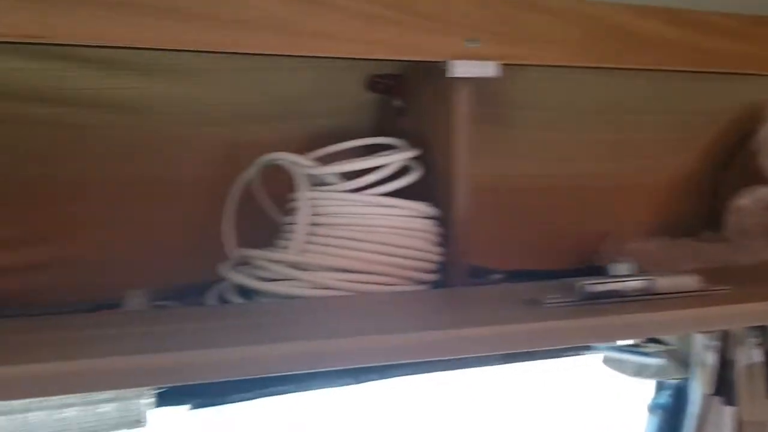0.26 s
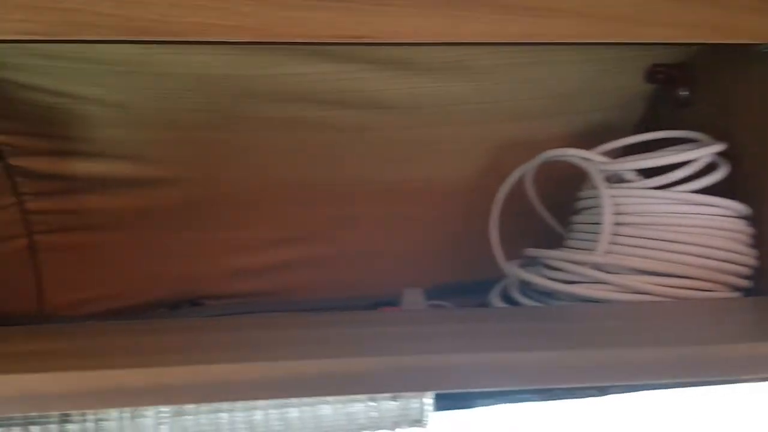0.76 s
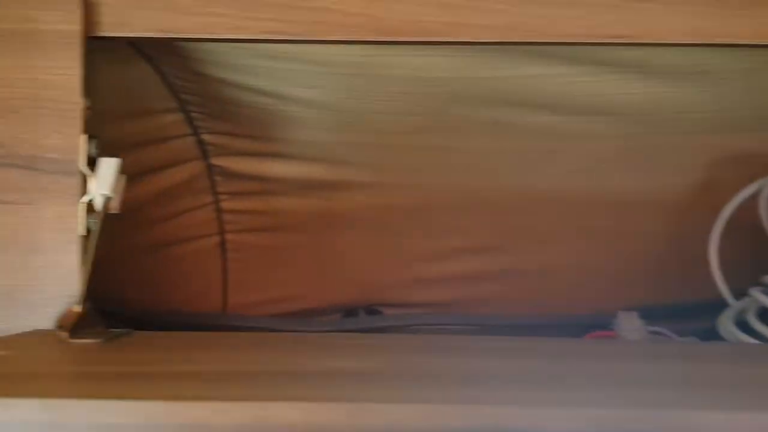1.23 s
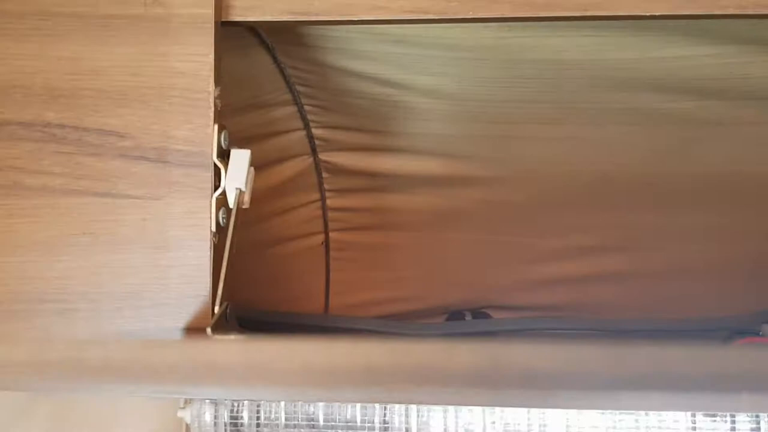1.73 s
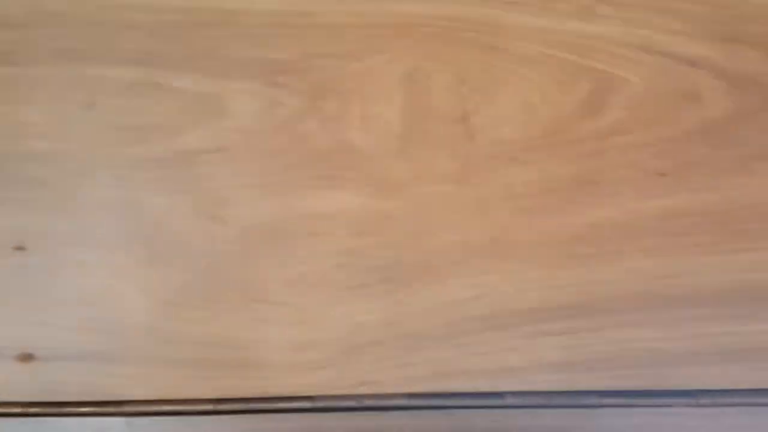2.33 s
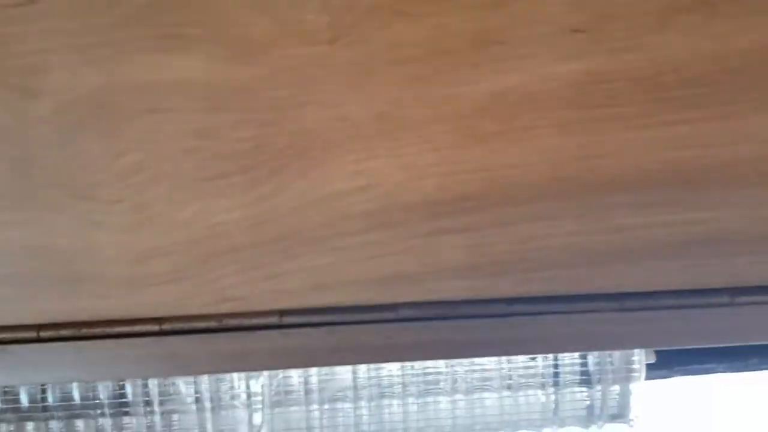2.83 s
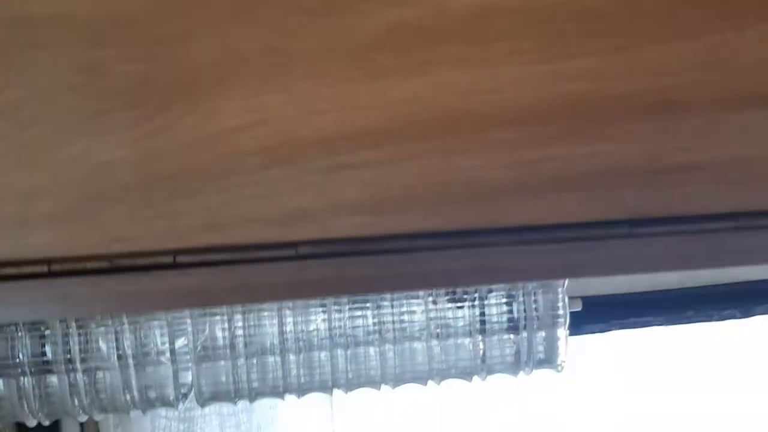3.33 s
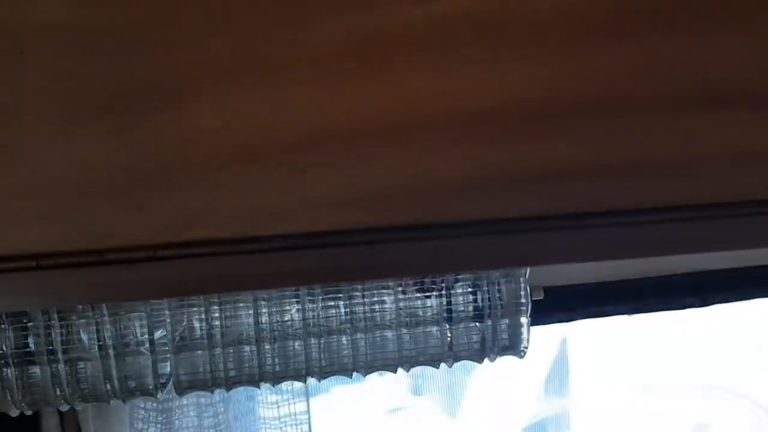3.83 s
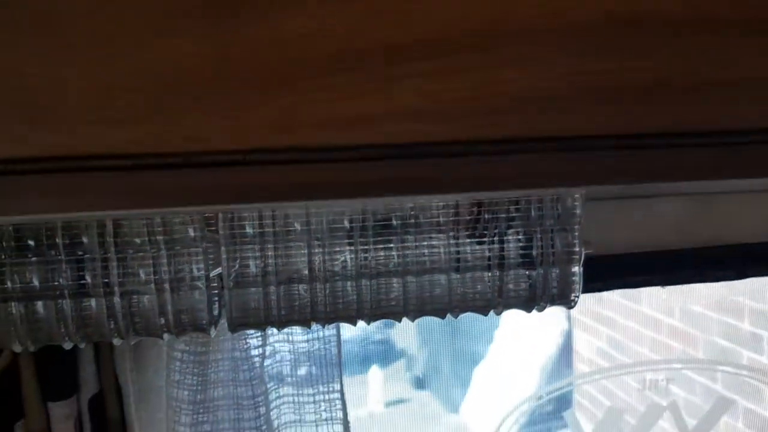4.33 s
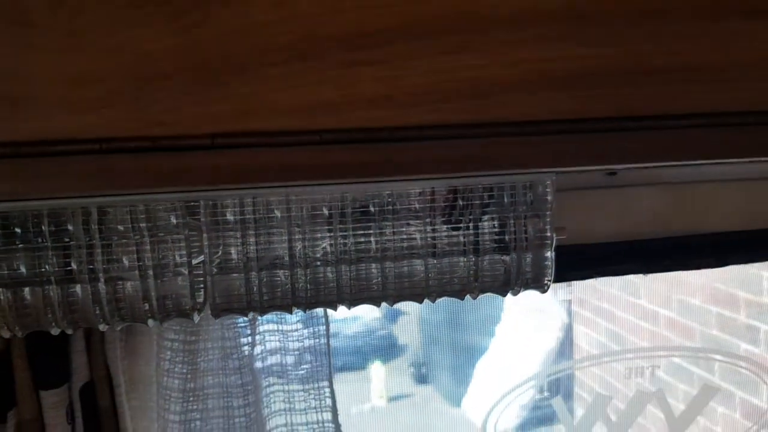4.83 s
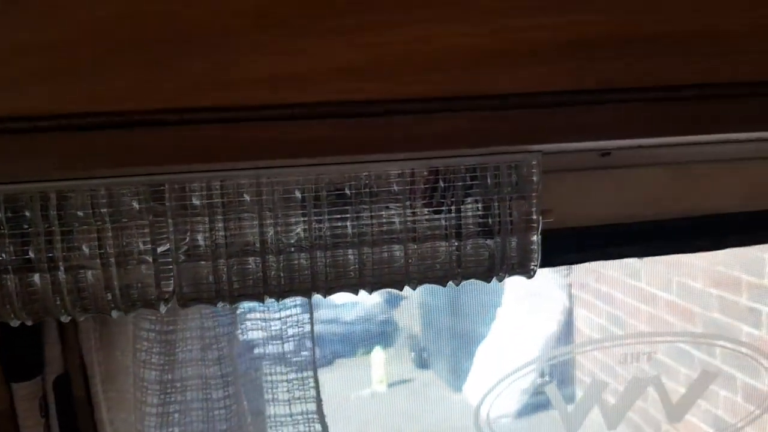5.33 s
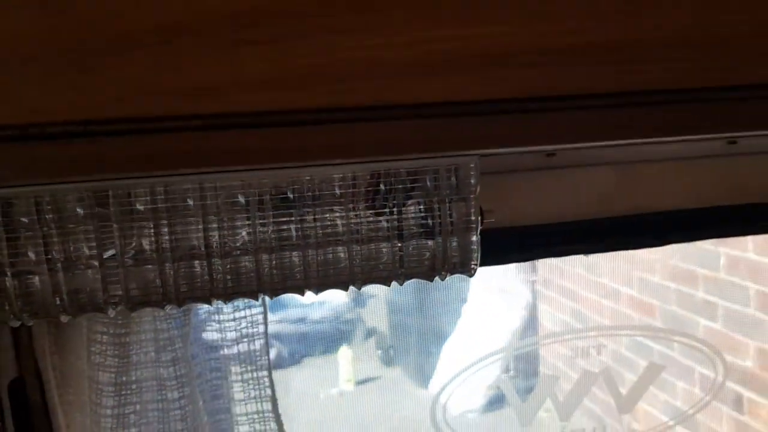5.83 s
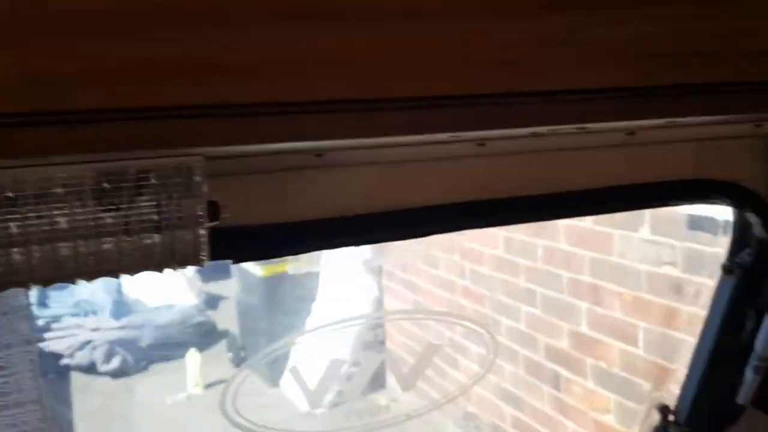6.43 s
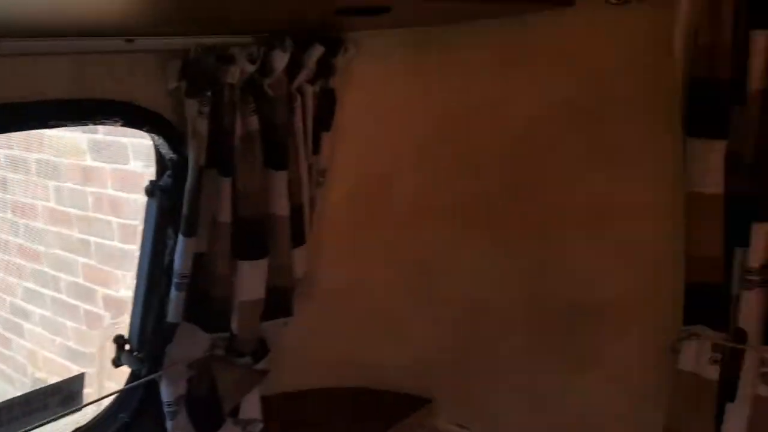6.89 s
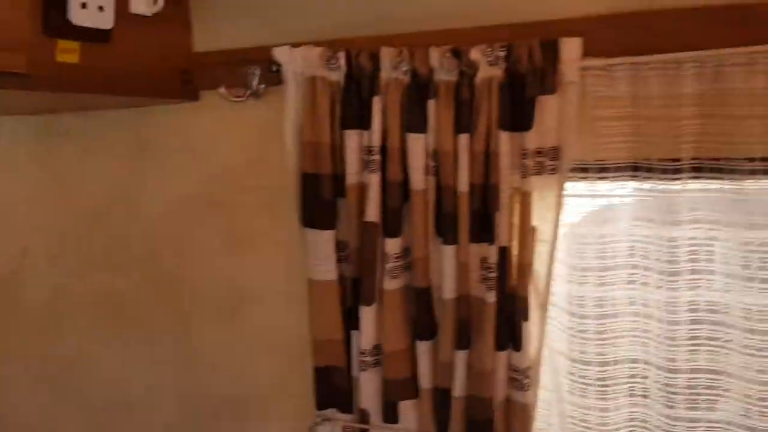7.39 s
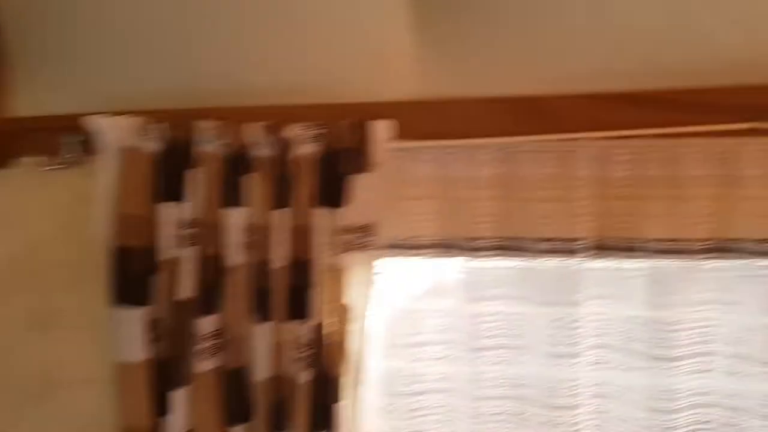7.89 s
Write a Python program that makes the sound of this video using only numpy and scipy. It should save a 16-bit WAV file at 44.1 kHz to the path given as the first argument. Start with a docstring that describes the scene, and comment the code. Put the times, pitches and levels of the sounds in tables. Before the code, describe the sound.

Inside a small caravan, a hand moves a wooden overhead locker door. Faint bumps and rubbing come first, then a clatter of knocks and clicks just before two seconds and a loud, hard shutting clack around 2.4. Smaller clicks follow, with firm thuds near 3.8 and 5.0 and a short fumble afterwards. The end is nearly quiet, with soft rubs and ticks. Close handheld stereo microphone, dry room, light hiss.

```python
"""A wooden overhead locker door is handled, swung and shut in a small caravan, close to a phone.
Knocks ring the panel and cabin as fading sine tones; the catch, stay and fingers click as short noise bursts.
Sliding contacts sing as noise in gliding bands; hands, door and clothes rub as coloured noise that swells and fades.
The phone has two microphone ports, heard as left and right, and each port adds a soft hiss."""
import sys
import numpy as np
from scipy.fft import rfft, irfft, next_fast_len
from scipy.io import wavfile
from scipy.ndimage import uniform_filter1d, map_coordinates

SR = 44100
rng = np.random.default_rng(int(sys.argv[2]) if len(sys.argv) > 2 else 0)


def wrap_up_sound(samples):
    """Save the sound to the file named by the first command line argument, as 16-bit audio."""
    columns = np.atleast_2d(samples).T
    # keep every value between -1 and 1, then stretch to whole-number steps
    tamed = np.clip(columns, -1, 1)
    steps = np.round(tamed * 32767).astype(np.int16)
    wavfile.write(sys.argv[1], SR, steps)


N = 359409

# Knocks on wood, before the trims in knocks():
# (time [s], panel level [dB], cabin boom re panel [dB], upper tones re panel [dB])
KNOCK_EVENTS = [(0.009, -42, 11, 1), (0.337, -42, 14.5, -2.5), (0.713, -34.5, 9.5, -8.5),
                (0.789, -34.5, 11, -8), (0.875, -52, 16, -26), (0.937, -56, 13, -20), (0.979, -48, 8, -4.5),
                (1.061, -43.5, 20, -2), (1.103, -36, 2.5, -13.5), (1.349, -40.5, -5, -16),
                (1.382, -31, -7, -14.5), (1.423, -26, -13, -18.5), (1.664, -27, -16, -15),
                (1.71, -31.5, -28, -12), (1.757, -26, -0.5, -13), (1.812, -12.5, -35, -10),
                (1.84, -20, -6, -1.5), (1.863, -29.5, -29, -2), (1.884, -19.5, -25, -14),
                (1.918, -17, -18, -10), (1.961, -29, -8, 0.5), (2.061, -34, -38, -1.5),
                (2.178, -26, -12, -7.5), (2.206, -24, -24, -7.5), (2.26, -21.5, -12, -16),
                (2.401, -3, -9, -8.5), (2.545, -39.5, -4, -7.5), (2.596, -41, -26, -5),
                (2.804, -32, 2, -2.5), (2.896, -37.5, 6.5, 4.5), (3.013, -36.5, -13.5, -17),
                (3.193, -30, 2, -7.5), (3.277, -37, -14, -2.5), (3.333, -31.5, -13, -7),
                (3.539, -36, -10, -4.5), (3.557, -30, -26.5, -6), (3.72, -37, 2.5, -18),
                (3.768, -13.5, -8, -6.5), (3.99, -37.5, -7.5, -17), (4.042, -37.5, -3, -6),
                (4.192, -40.5, 4, -19.5), (4.274, -43, -7.5, -20), (4.375, -38.5, -2, -10.5),
                (4.419, -49, -4.5, -10), (4.541, -44.5, -10.5, -8.5), (4.603, -50.5, -4.5, -27),
                (4.722, -48.5, 7.5, -23), (4.773, -38.5, -1.5, -10.5), (5.001, -36.5, 5, -12),
                (5.041, -9, -7.5, -7.5), (5.176, -28, -2, -2), (5.211, -34, -3.5, -15.5),
                (5.307, -55, -4, 4), (5.4, -30.5, 1.5, -0.5), (5.464, -34.5, -15, -6),
                (5.487, -32.5, -8, -26), (5.501, -46, -17, 7.5), (5.534, -34.5, -8.5, -0.5),
                (5.628, -40, -16.5, -14), (5.7, -39.5, -1, -13), (5.736, -36, -10, -17),
                (5.829, -40, 4.5, -13), (5.854, -33, -13.5, -14), (6.201, -36.5, -19, -17.5),
                (6.212, -27, -9.5, -23.5), (6.46, -42.5, -3.5, -29.5), (6.643, -41, -11.5, -25),
                (6.747, -36, -8, -29), (7.058, -39, -17.5, -3), (7.226, -42.5, -7.5, 4),
                (7.264, -38.5, -2, 1.5), (7.437, -39.5, 1, 0.5), (7.85, -41.5, 14.5, 0),
                (7.881, -40, 5.5, -3), (7.911, -54, -5, 0)]
# Ringing tones (modes) of the cabin, the door panel and the higher wood tones, before damping by the hand:
# (frequency [Hz], level [dB], time to fall 60 dB [s])
CABIN_MODES = [(46.5, 1, 0.54), (55.3, 3, 0.43), (77.4, 0, 0.41), (103, -3.5, 0.43)]
PANEL_MODES = [(132, -2.5, 0.15), (179.9, -1, .13), (204.95, 2.5, .12), (239.7, -1.5, 0.075),
               (317, -7.5, .1)]
UPPER_MODES = [(425, 3, 0.1), (465.3, 6, 0.075), (534, -4, 0.16), (643, 9, 0.043), (745.6, 1, 0.088),
               (858, -9, 0.089), (931, -2.5, 0.062), (1010, 0, 0.039), (1473, -10.5, 0.13),
               (1614, -13.5, 0.015)]
# The holding hand damps the modes: factors on the fall times and on the build-up time
WOOD_DAMPING, CABIN_DAMPING, SOFTNESS = 0.96, 0.69, 0.99

# Clicks of catch, stay and fingers, before the trims in clicks():
# (time [s], level [dB], low part re level [dB], bright part re level [dB], airy part re level [dB],
#  ring pitch [Hz], ring re level [dB], tail time to fall 60 dB [s], tail re crack [dB])
CLICK_EVENTS = [(0.0094, -40.5, 4.5, -26, -25, 1465, -15, .14, -9.5),
                (0.3386, -53, 10, -26, -26.5, 1367, -22, 0.12, 1.5),
                (0.3861, -56, -22, 2, 4, 6614, 5, 0.33, -18),
                (0.7198, -44.5, 5.5, -26, -22, 1350, -6, 0.37, -9.5),
                (0.7901, -52.5, 16, -22, -28, 1885, 14, 0.13, -1.5),
                (1.061, -51.5, 4.5, -22, -21, 1836, -2, 0.2, -2),
                (1.305, -69, -11, -9, 2, 4770, -5, 0.36, -1.5),
                (1.385, -51.5, 1, -4.5, -3.5, 1430, -15, 0.41, -4.5),
                (1.6622, -55, 2, -6.5, 2.5, 1210, -14, 0.24, -3),
                (1.7096, -64, 13, -8, -3, 1390, -5, 0.18, 0.5),
                (1.8184, -45, -16, -6.5, -18.5, 1270, 4, 0.36, 3),
                (1.8375, -27.5, -1, -16, -12.5, 3100, -4, 0.15, -0.5),
                (1.8572, -34.5, -8, 1.5, -14.5, 4000, 3, 0.035, -3),
                (1.8798, -30, 7.5, -4.5, -13.5, 1520, -9, .056, -3),
                (1.916, -40.5, 11, -29, -40, 1480, -8, 0.15, -7),
                (1.9396, -47.5, 16.5, -16, -27.5, 1340, -8, 0.18, -7.5),
                (1.9639, -48, -22, -18, -21.5, 2100, -8, 0.19, -8),
                (2.0604, -47, 3, -13.5, -21, 1610, -8, 0.69, -11.5),
                (2.175, -53.5, -11, -9.5, -12, 1310, 5, 0.42, 1),
                (2.3958, -24, 3, -7.5, -1.5, 5130, 1, 0.15, -11),
                (2.3979, -3, -6, -16, -20, 2870, -7, .1, -12.5),
                (2.4137, -10, -2, -22, -33.5, 3400, -14, 0.065, -8.5),
                (2.8013, -29, -6, -14, -29.5, 4170, -5.5, 0.24, -12.5),
                (2.8187, -43, 9, -9, -25.5, 2780, 6, 0.14, -12),
                (2.895, -27, -4, -11, -12, 3280, -10, .13, -14),
                (3.1951, -55, 18.5, -12.5, -19.5, 1370, -11, 0.19, -5),
                (3.22, -29.5, -2, -1, -5.5, 6330, 2, 0.18, -18),
                (3.2831, -43.5, 4.5, -2, -10, 3200, -18, 0.56, -13),
                (3.3346, -21, -11, -20, -18, 2710, -7, 0.092, -9),
                (3.4157, -42, 7, -15, -22, 1590, -8, 0.26, -9.5),
                (3.5386, -52, 5, -24, -28, 1430, 14, 0.26, 0),
                (3.5737, -38, 9, -32, -37.5, 2770, 3.5, 0.089, -10.5),
                (3.7168, -55.5, -14, -24, -22, 2910, -10, .085, -12),
                (3.7706, -17, -4, -23.5, -37, 3180, -7, 0.09, -7.5),
                (3.8664, -59.5, 1.5, -11, -16.5, 1506, -8.5, 0.1, -8.5),
                (3.9866, -58.5, 7, -17, -20.5, 1270, -9, 0.84, -8),
                (4.0444, -45, 4.5, 0, -6.5, 2790, -4.5, .13, -7),
                (4.1905, -49, 1.5, -9, -21.5, 1275, -7, 0.16, -11),
                (4.5424, -64.5, 2.5, -9.5, -15, 1440, -6, 0.16, 0),
                (4.776, -57, 3.5, -15.5, -25.5, 1423, 8.5, 0.12, 2),
                (4.969, -68.5, 17, -16.5, -10.5, 1420, -13.5, 0.21, -8),
                (4.9984, -67.5, 15, -16, -9, 1270, -4, 0.35, -7),
                (5.0399, -22, -1, -26, -34.5, 3130, -0.5, 0.12, -2),
                (5.1573, -43.5, 4, -21, -24, 2250, -9, 0.22, -1.5),
                (5.183, -37, 13, -28, -32, 1970, 7, 0.059, -3.5),
                (5.3985, -38, 10, -12, -13, 1207, -5.5, 0.31, -7.5),
                (5.4111, -42.5, -21, -5.5, 6, 13880, 5.5, 0.053, -7),
                (5.4139, -32, 3, -7, -7.5, 2490, 0.5, .065, -8),
                (5.503, -40.5, 7, -8, -15.5, 1530, -6, 0.23, -2.5),
                (5.5363, -24.5, -4, -33, -29.5, 4140, 7, 0.12, -7),
                (5.5539, -35.5, 0, -12, -28, 1520, 8, 0.099, -26),
                (5.8305, -64, -3, -16.5, -11, 1200, -8.5, 0.11, -5),
                (5.8596, -65, -16, -6.5, 0.5, 4170, 0, 0.24, -2.5),
                (6.2092, -67, 9, -23, -11.5, 1243, -7, 0.19, -5),
                (6.7955, -60, 12.5, -17, -8.5, 1770, -13, 0.22, -8),
                (7.0919, -55, 13, -26, -32.5, 2430, -0.5, 0.2, -2.5),
                (7.22, -61.5, 11, -9, -10.5, 1390, -7.5, 0.22, -1),
                (7.5979, -58, -12, 1, 2, 2090, -3.5, 0.35, -10),
                (7.7437, -66.5, -7, 13, 13, 6200, -4, 0.078, -20),
                (7.85, -64, 14.5, 4.5, 9, 2000, -5, 0.15, -5),
                (7.8618, -39.5, 17, -7.5, -2, 1930, 11.5, 0.27, -24.5)]
# Colours of a click's four parts: (frequency [Hz], level per Hz [dB])
LOW_COLOUR = [(150, -72.5), (500, -30.5), (1000, -1), (1500, -1), (2000, -4.5), (2800, -13.5),
              (6000, -79.5)]
MIDDLE_COLOUR = [(500, -73.5), (1500, -20), (2300, -5.5), (2900, -4.5), (3500, -8.5), (4600, -9.5),
                 (6500, -23), (12000, -78.5)]
BRIGHT_COLOUR = [(2000, -75.5), (4000, -23), (5600, 0.5), (7000, -5), (9000, -8.5), (11500, -22.5),
                 (17000, -68.5)]
AIRY_COLOUR = [(3500, -82.5), (7000, -24), (9500, -1), (12000, 3), (15500, -4.5), (18000, -60.5)]
CLICK_RING_S, CRACK_LENGTH = 0.022, .85  # time in which the ring falls 60 dB, factor on the crack's fall time

# Sliding contacts that sing in a band:
# (time [s], length [s], first centre [Hz], last centre [Hz], band width [Hz], level [dB])
SLIDE_EVENTS = [(0.438, 0.18, 1110, 1188, 200, -60), (0.5, 0.2, 1405, 1247, 280, -67),
                (2.198, 0.054, 2800, 2920, 220, -49), (2.169, 0.31, 1404, 1620, 463, -55),
                (2.177, 0.32, 615, 643, 199, -48.5), (2.188, 0.29, 2740, 2830, 900, -61),
                (2.264, 0.19, 3250, 3520, 600, -58), (2.327, .09, 5800, 5900, 1200, -63),
                (2.262, 0.21, 4120, 4240, 397, -58), (5.141, 0.083, 5140, 5610, 900, -64),
                (5.611, 0.151, 1306, 1466, 656, -62), (6.495, 0.037, 2210, 2115, 1206, -75.5),
                (6.779, 0.068, 2172, 1902, 1370, -69), (6.955, .085, 3600, 2600, 1100, -65),
                (7.37, 0.092, 1893, 2035, 400, -70), (7.734, 0.091, 1877, 1765, 553, -71),
                (7.853, 0.092, 2030, 1996, 2700, -62), (8.061, 0.15, 1906, 1980, 652, -69)]
# Second and third partial of a slide: level re the first [dB]
OVERTONE_LEVELS = [-20, -24]

# Strokes of hand and door over wood: (time [s], length [s], level [dB], grit re level [dB])
WOOD_STROKES = [(0, 0.033, -53, 4), (0.41, 0.96, -62.5, -15), (1.054, 0.25, -81, -12),
                (1.654, 0.22, -61, -18), (1.754, 0.34, -41.5, -11), (1.988, .17, -66, 1),
                (2.15, .3, -58.5, 2), (2.415, 0.053, -58, -8), (2.618, 0.44, -59, -6.5),
                (2.789, 0.41, -67, 0), (3.213, 0.24, -50.5, -1.5), (3.336, 0.23, -56.5, -1.5),
                (3.504, 0.19, -65.5, -7.5), (3.776, 0.2, -67, -16), (4.017, 0.49, -73.5, 1.5),
                (4.376, 0.18, -65.5, -7), (5.098, 0.17, -50.5, -3.5), (5.453, 0.17, -45.5, -4.5),
                (5.559, 0.25, -64.5, 4), (6.444, 1, -84.5, -11.5), (6.881, 0.42, -70.5, -4),
                (6.999, 0.98, -75, -6.5), (7.036, 0.23, -57, -21.5), (7.194, 0.15, -59.5, -18),
                (7.348, 0.41, -64.5, -15), (7.593, 0.48, -78, -5.5), (8.032, 0.26, -71, 3.5)]
# Sleeve and cloth swishes: (time [s], length [s], level [dB])
CLOTH_SWISHES = [(0, 0.07, -76), (0.725, 0.27, -64), (1.37, 0.38, -71.5), (1.705, 0.43, -57.5),
                 (2.12, 0.51, -57), (2.62, 0.58, -67), (3.257, 0.4, -64), (4.039, 0.33, -75.5),
                 (4.337, 0.248, -62), (5.067, .22, -70), (5.396, 0.56, -67.5), (5.811, 0.2, -73.5),
                 (6.877, 0.256, -66), (7.112, 0.98, -74.5), (7.545, 0.62, -80), (7.801, 0.23, -59),
                 (8.04, 0.215, -69)]
# The hand never rests on phone and wood: (time [s], cabin rumble [dB], panel rub [dB], scrape [dB])
HAND_LEVELS = [(0.0, -32, -67.5, -113), (0.36, -75.5, -61.5, -74.5), (0.59, -53, -53.5, -61.5),
               (0.95, -54, -58.5, -105), (1.18, -54.5, -60, -83), (1.7, -61, -50.5, -77),
               (1.86, -30, -48.5, -53), (2.31, -63, -41, -62), (2.54, -52.5, -55, -70),
               (3.27, -54.5, -53, -76), (3.4, -48, -51, -71), (3.54, -55, -57, -73), (4.2, -52, -63.5, -81),
               (4.72, -60, -71, -85.5), (5.01, -57, -66.5, -83.5), (5.15, -58, -62, -77),
               (5.63, -40.5, -50.5, -63), (5.79, -50, -58, -72.5), (5.95, -58.5, -64.5, -84),
               (6.2, -69, -74, -86.5), (6.6, -57, -60.5, -81.5), (7.31, -55, -54.5, -60.5),
               (7.69, -49.5, -57, -68), (8.15, -65, -70.5, -81.5)]
# Colours of the five movement noises: (frequency [Hz], level per Hz [dB])
RUMBLE_COLOUR = [(15, -45.5), (30, -10), (50, -8.5), (80, -1), (120, -9.5), (180, -30), (400, -70)]
RUB_COLOUR = [(70, -41.5), (130, 3.5), (200, 2), (300, -2), (500, -13), (800, -28.5), (1400, -49),
              (4000, -90)]
SCRAPE_COLOUR = [(120, -86), (300, -42), (600, 8), (900, 2), (1300, -4), (1800, -9.5), (2600, -28.5),
                 (6000, -81.5)]
GRIT_COLOUR = [(500, -80), (1200, -30.5), (2000, -2), (2900, -3.5), (3600, -6), (4500, -5), (6500, -27),
               (12000, -84.5)]
SWISH_COLOUR = [(1200, -80), (3000, -28), (5000, -1), (6500, 0), (8000, -3), (12000, -5), (16000, -8),
                (18000, -60)]
# Depth of the lumps in rumble, rub, scrape, grit and swish: one value each [dB]
LUMP_DEPTHS = (2.2, 2.2, 2.0, 1.8, 1.5)
# Quiet level between strokes: (grit [dB], swish [dB])
REST_LEVELS = (-93.5, -87.5)
RISE, FALL, BEND = 0.34, 0.71, 2.4  # shares of a stroke spent swelling and fading, curvature of both
STROKE_RUB_DB, STROKE_RUMBLE_DB = 6.5, 6  # what a stroke passes to panel and cabin, re its level

# The phone turns, before the offsets added to the balance:
# (time [s], lag of the left port [ms], left-right balance [dB])
PHONE_TURN = [(.7, -0.6, -1), (1.9, -0.28, 1.5), (2.348, 0.22, 0), (5.9, 0.39, 0.5), (7.1, 0.86, 0.5),
              (7.498, 0.1, -2), (7.852, 0, -11)]
# How alike the two ports sound: (frequency [Hz], likeness [0 to 1])
PORT_LIKENESS = [(40, 0.81), (150, 0.99), (350, 0.42), (700, 0.18), (2000, 0.14), (8000, 1), (16000, 0.41)]
# Colour of the microphone hiss: (frequency [Hz], level per Hz [dB])
HISS_COLOUR = [(180, -36.5), (300, -3.5), (367, -11.5), (1770, -12.5), (2210, -13.5), (2570, -12.5),
               (8580, -20.5), (10500, -9.5), (15200, -5.5), (16500, -22.5)]
HISS_DB = -77.5 + 5.0  # before the low cut
LOW_CUT_HZ, TOP_HZ = 47, 16000  # corner of the low cut, band limit


def amp(db):
    """Turn decibels into a gain."""
    return 10 ** (np.asarray(db) / 20)


def unit(x):
    """Scale each row to an average strength (rms) of 1."""
    return x / np.sqrt(np.mean(x ** 2, axis=-1, keepdims=True) + 1e-20)


def along(points, hz):
    """Read a (frequency, value) curve, with frequency spaced on a log scale."""
    f, value = np.transpose(points)
    return np.interp(np.log(hz + 1), np.log(f + 1), value)


def curves(rows):
    """Draw straight lines between table rows: one value per sample for each column after the time."""
    s, *columns = np.transpose(rows)
    return [np.interp(np.arange(N) / SR, s, column) for column in columns]


def wobble(rate):
    """Make a smooth random curve with this many random points a second."""
    points = rng.standard_normal(int(N * rate / SR) + 4)
    return map_coordinates(points, [np.arange(N) * rate / SR])


def filtered(x, response):
    """Change each frequency of x by the given response."""
    n = x.shape[-1]
    m = next_fast_len(n + 4096)  # spare room keeps the end from wrapping onto the start
    spectrum = rfft(x, m) * response(np.fft.rfftfreq(m, 1 / SR))
    return irfft(spectrum, m)[..., :n]


def ports(pair, colour):
    """Colour two noises and mix them so that left and right are as alike as the two ports."""
    def response(hz):
        angle = np.arccos(np.clip(along(PORT_LIKENESS, hz), -1, 1)) / 2
        shares = np.array([np.cos(angle), np.sin(angle)])[:, None]
        return amp(along(colour, hz)) * shares

    mid, side = filtered(pair, response)
    return np.array([mid + side, mid - side])


def add(track, rows, times):
    """Lay each stereo sound (2, events, samples) into the track at its time."""
    for k, s in enumerate(times):
        part = track[:, round(s * SR):][:, :rows.shape[2]]
        part += rows[:, k, :part.shape[1]]


def balanced(sound, balance_db):
    """Share a level difference between left and right."""
    return sound * np.array([amp(balance_db / 2), amp(-balance_db / 2)])


def knocks():
    """Every blow rings the same modes at new strengths; heavy low modes build up slower."""
    s, panel_db, boom_db, upper_db = np.transpose(KNOCK_EVENTS)[:, :, None]
    t = np.arange(SR // 3) / SR
    # modes, level [dB], factor on fall time, build-up time before softness [s], left-right spread
    groups = (
        (CABIN_MODES, panel_db + boom_db - 2.5, CABIN_DAMPING, .012, .18),
        (PANEL_MODES, panel_db - 3.5, WOOD_DAMPING, .004, .11),
        (UPPER_MODES, panel_db + upper_db - 8.5, WOOD_DAMPING, .002, .6),
    )
    sound = 0
    for modes, group_db, damping, rise, spread in groups:
        for hz, mode_db, t60 in modes:
            size, detune, start, lean = rng.standard_normal((len(s), 4)).T[:, :, None]
            phase = 2 * np.pi * hz * (1 + .02 * detune) * t + .4 * start
            level_db = group_db + mode_db + 1.8 * size
            build_up = 1 - np.exp(-t / (rise * SOFTNESS))
            envelope = amp(level_db - 60 * t / (t60 * damping)) * build_up
            # each mode reaches the two ports unevenly, in level and in phase
            apart = spread * np.array([lean, -lean])
            sound = sound + envelope * amp(0.87 * apart) * np.sin(phase + apart)
    when, _, balance_db = np.transpose(PHONE_TURN)
    balance = np.interp(s, when, balance_db) + 0.76
    track = np.zeros((2, N))
    add(track, balanced(sound, balance), s[:, 0] + .0012)
    return track


def clicks():
    """A sharp crack and a short ring, then the rattle and the cabin's answer, which loses its treble first."""
    s, db, low_db, bright_db, airy_db, hz, ring_db, t60, tail_db = np.transpose(CLICK_EVENTS)[:, :, None]
    lead = .003  # silence ahead of each crack [s]
    t = np.clip(np.arange(SR // 4) / SR - lead, 0, 1)
    # loose parts chatter unevenly
    chatter = uniform_filter1d(rng.standard_normal((len(s), len(t))), size=130, axis=1)
    rattle = amp(2.0 * unit(chatter) - 0.5)
    ring = amp(db + ring_db - 60 * t / CLICK_RING_S) * np.sin(2 * np.pi * hz * t)
    sound = ring * (1 - np.exp(-t / 0.00068))
    # colour, level re click [dB], crack fall time before its length factor [s], factor on tail time
    parts = (
        (LOW_COLOUR, low_db - 8.0, .022, 1.1),
        (MIDDLE_COLOUR, -4., .012, 1.01),
        (BRIGHT_COLOUR, bright_db + 4.5, .008, .85),
        (AIRY_COLOUR, airy_db + 3.5, .005, .62),
    )
    for colour, part_db, crack_fall, keep in parts:
        crack = amp(-60 * t / (crack_fall * CRACK_LENGTH))
        tail_fade = amp(tail_db - 60 * t / (keep * np.clip(t60, .02, .5)))
        tail = tail_fade * (1 - np.exp(-t / 0.0022)) * rattle
        force = (crack + tail) * (t > 0)
        burst = force * rng.standard_normal((len(s), 2, len(t))).transpose(1, 0, 2)
        # divide by the strength (rms) that the colour lets through
        power = amp(2 * along(colour, np.linspace(0, SR / 2, num=999)))
        passed = np.sqrt(np.mean(power))
        sound = sound + ports(burst, colour) * amp(db + part_db) / passed
    when, lag_ms, balance_db = np.transpose(PHONE_TURN)
    lag = np.interp(s, when, lag_ms) / 1000
    delays = np.clip(np.array([lag, -lag]), 0, 1)  # only the later port is delayed
    sound = filtered(sound, lambda f: np.exp(-2j * np.pi * f * delays))
    balance = np.interp(s, when, balance_db) - 0.7
    track = np.zeros((2, N))
    add(track, balanced(sound, balance), s[:, 0] + .0011 - lead)
    return track


def slides():
    """Friction noise inside a narrow band whose centre glides along the stroke."""
    s, length, first_hz, last_hz, width_hz, db = np.transpose(SLIDE_EVENTS)[:, :, None]
    t = np.arange(round(length.max() * SR)) / SR
    u = np.clip(t / length, 0, 1)  # progress from 0 to 1
    draw = rng.standard_normal((len(s), 4, len(t))).transpose(1, 0, 2)
    draw[2:] = 0.28 * draw[:2] + 1.6 * draw[2:]  # the ports hear partly the same friction
    phase = 2 * np.pi * np.cumsum(first_hz + (last_hz - first_hz) * u, axis=1) / SR
    shape = np.clip(12 * u, 0, 1) * np.clip(5 * (1 - u), 0, 1)
    song = 0
    for k, over_db in enumerate([0, *OVERTONE_LEVELS], 1):
        # slow noise times a tone becomes a noise band around that tone
        slow = unit(filtered(draw, lambda f: 1 / (1 + (2 * f / (k * width_hz)) ** 2)))
        band = slow[::2] * np.cos(k * phase) + slow[1::2] * np.sin(k * phase)
        song = song + amp(over_db) * band
    track = np.zeros((2, N))
    add(track, amp(db) * shape * song, s[:, 0])
    return track * amp(1.4 * wobble(76))  # the grip is uneven


def swells(start, length, db):
    """Sum the strengths of strokes, each swelling and fading."""
    step = 32  # samples that share one value
    u = (np.arange(0, N, step) / SR - start[:, None]) / length[:, None]
    shape = (np.clip(u / RISE, 0, 1) * np.clip((1 - u) / FALL, 0, 1)) ** BEND
    return np.repeat(amp(db) @ shape, step)[:N]


def moves():
    """Rubbing grips and slips, so each noise comes in lumps at its own rate, with a slower sway shared by all."""
    rumble_db, rub_db, scrape_db = curves(HAND_LEVELS)
    s, length, db, grit_db = np.transpose(WOOD_STROKES)
    stroke = swells(s, length, db)
    rumble = amp(rumble_db) + amp(STROKE_RUMBLE_DB) * stroke
    rub = amp(rub_db) + amp(STROKE_RUB_DB) * stroke
    scrape = amp(scrape_db) + stroke
    grit = amp(REST_LEVELS[0]) + swells(s, length, db + grit_db)
    swish = amp(REST_LEVELS[1]) + swells(*np.transpose(CLOTH_SWISHES))
    gains = (rumble, rub, scrape, grit, swish)
    colours = (RUMBLE_COLOUR, RUB_COLOUR, SCRAPE_COLOUR, GRIT_COLOUR, SWISH_COLOUR)
    rates = (14, 30, 75, 41, 79)  # random points a second
    sound, shared = 0, wobble(12)
    for gain, colour, depth_db, rate in zip(gains, colours, LUMP_DEPTHS, rates):
        lumps = amp(depth_db * wobble(rate) + 1.7 * shared)
        noise = ports(rng.standard_normal((2, 1, N)), colour)[:, 0]
        sound = sound + gain * unit(lumps * noise)
    return sound


def hiss():
    """Steady coloured noise, made separately for each microphone."""
    noise = rng.standard_normal((2, N))
    return amp(HISS_DB) * unit(filtered(noise, lambda hz: amp(along(HISS_COLOUR, hz))))


def scene():
    """Add the layers; the left port takes a little more of the rubbing."""
    rubbing = moves() * amp([[.4], [-.4]])
    return knocks() + rubbing + clicks() + slides()


def record(dry):
    """Add hiss, weaken the deepest bass, round off the loudest peaks and keep nothing above the band limit."""
    wet = filtered(dry + hiss(), lambda hz: (1j * hz / (LOW_CUT_HZ + 1j * hz)) ** 2)
    wet = wet / (1 + np.abs(wet / .98) ** 8) ** (1 / 8)
    return filtered(wet, lambda hz: hz < TOP_HZ)


dry = scene()
out = record(dry)
wrap_up_sound(out)
```